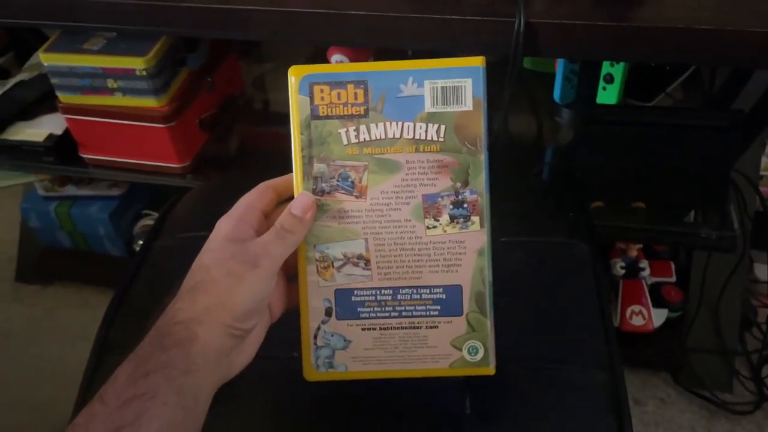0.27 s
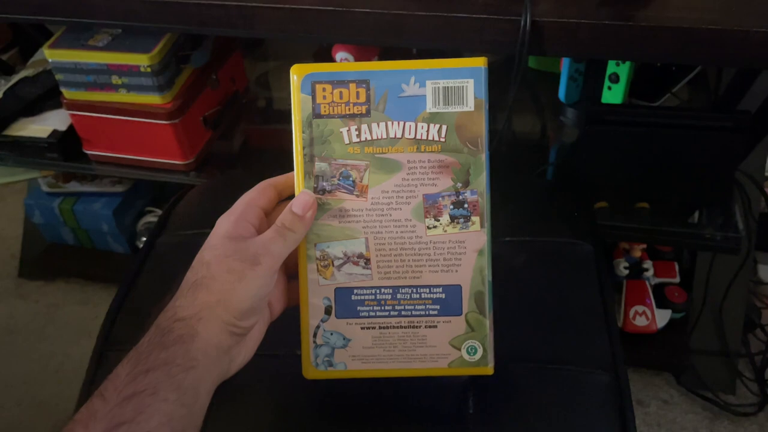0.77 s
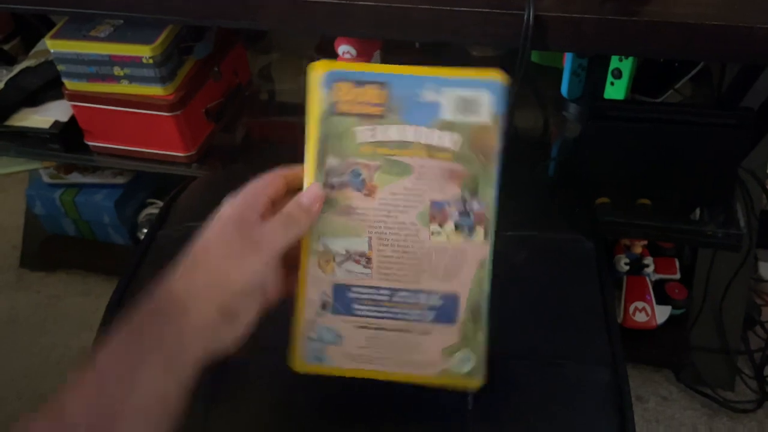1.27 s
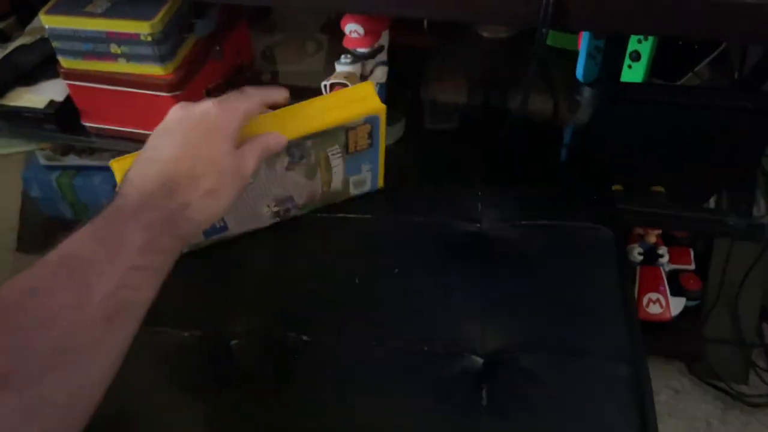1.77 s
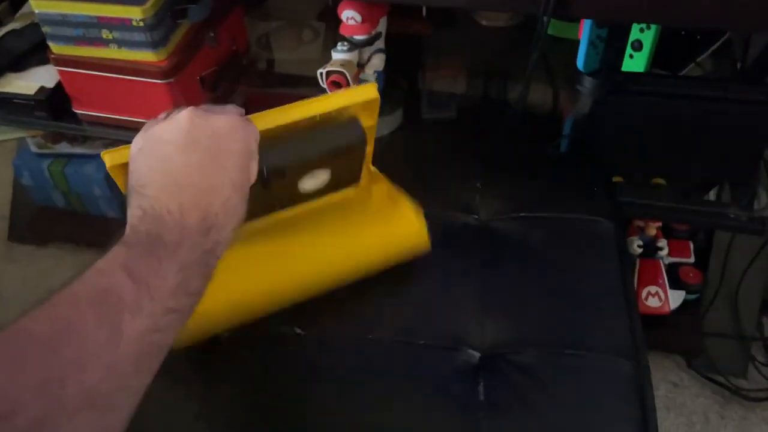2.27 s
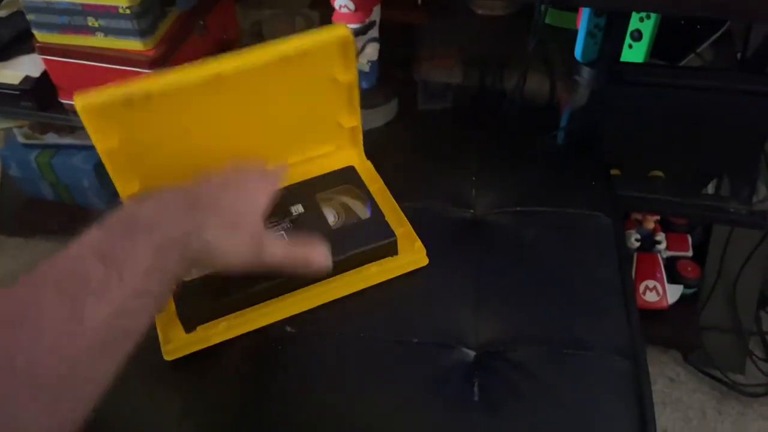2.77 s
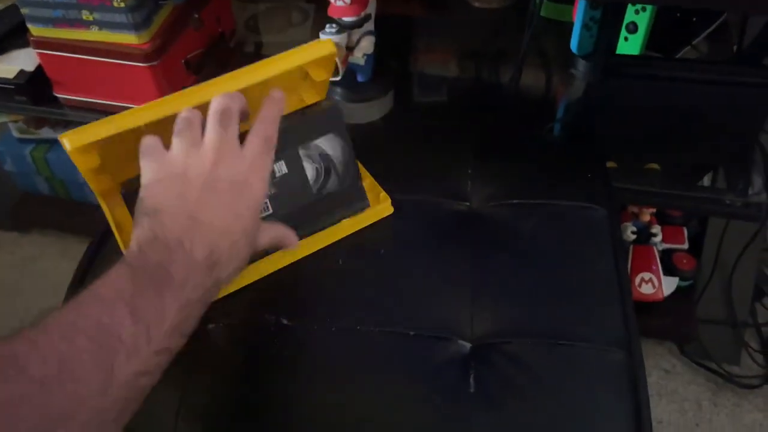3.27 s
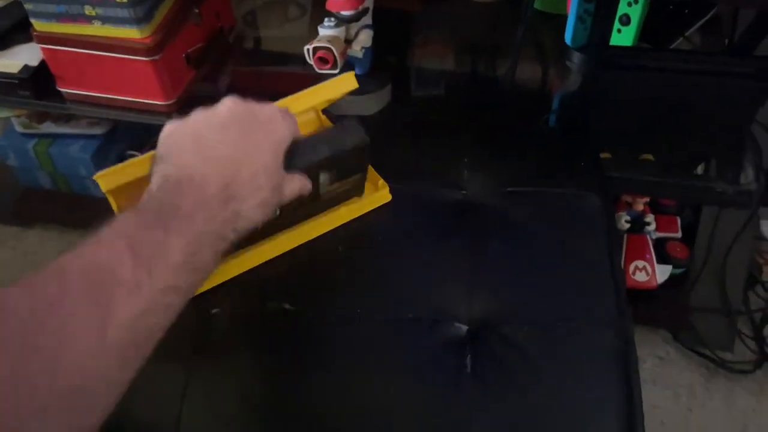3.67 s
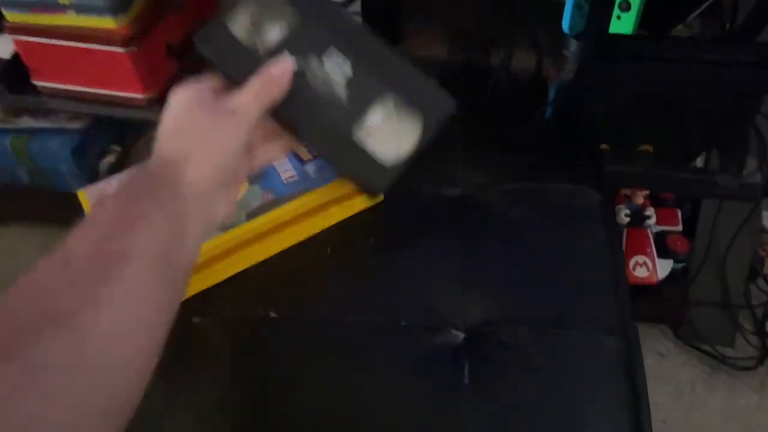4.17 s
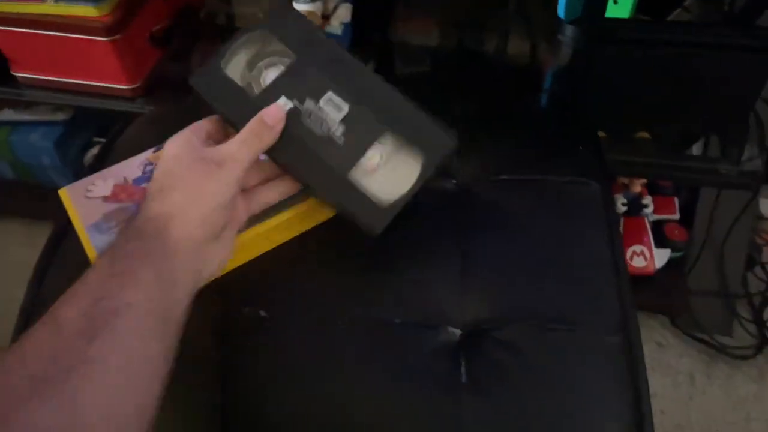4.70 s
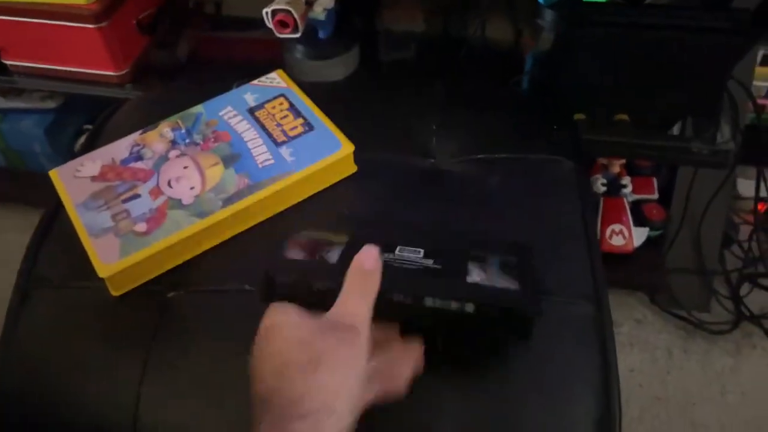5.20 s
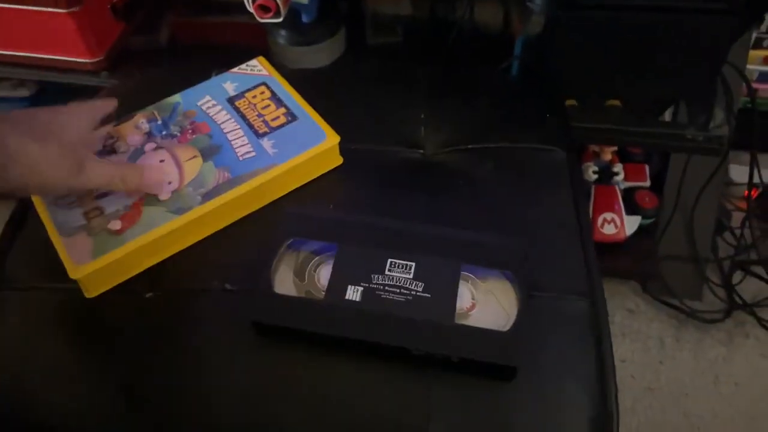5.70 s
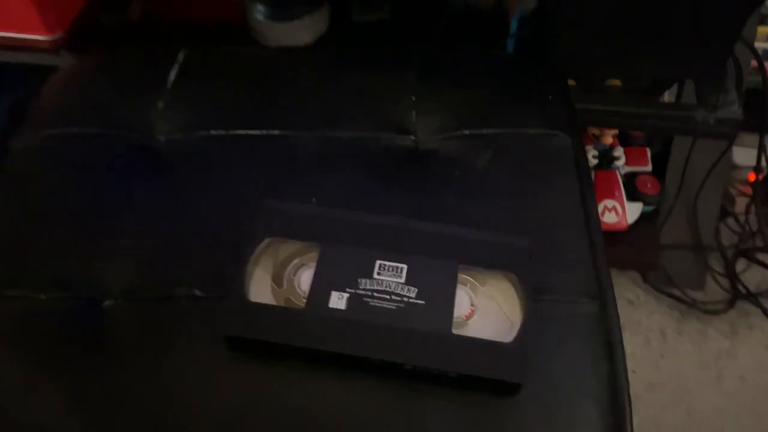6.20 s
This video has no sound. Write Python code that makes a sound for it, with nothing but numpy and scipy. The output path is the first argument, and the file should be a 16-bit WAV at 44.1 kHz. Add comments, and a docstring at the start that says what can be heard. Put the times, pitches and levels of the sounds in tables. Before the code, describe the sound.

In a small, quiet room with a low hum, hands handle a hollow plastic video case close to the microphone. It taps down on a padded seat and pops open with a cluster of sharp snaps. More clicks and scrapes follow as the cassette is worked loose. The cassette bumps the case with a hollow clack, slides onto the cushion and thuds softly, and the case is lifted away with faint rubbing.

```python
"""A plastic clamshell video case is turned over, set on a padded stool and snapped open in a small room.
The cassette is prised out, knocks against the closed case and slides onto the cushion; the case is lifted.
Each contact is a stick-slip crackle that rings the plastic, plus a hollow knock of the case walls.
Hands and plastic rub in between, tight edges squeak, the seat thuds. A close phone picks it up over
the low hum of a quiet house."""
import sys
import numpy as np
from scipy import signal
from scipy.fft import rfft, irfft
from scipy.io import wavfile
from scipy.ndimage import uniform_filter1d

SR = 44100
rng = np.random.default_rng(int(sys.argv[2]) if len(sys.argv) > 2 else 0)


def unload_wav(signal):
    """Save mono or channel-first audio to the path in sys.argv[1] as 16-bit WAV at rate SR, clipped to [-1, 1]."""
    wavfile.write(
        sys.argv[1],
        SR,
        np.round(np.clip(np.atleast_2d(signal).T, -1, 1) * 32767).astype(np.int16),
    )


N = 284445
T = np.arange(N) / SR
HIT_T = T[:SR // 4]

# plastic contacts: (time [s], contact time [s], wall pitch [Hz], knock [dB], snap [dB],
# treble re snap [dB])
CONTACTS = [(1.373, 0.0018, 376, -31.5, -53.5, -3.5), (1.463, 0.0028, 410, -40.5, -54, -0.5),
            (1.633, 0.0012, 379, -51, -70.5, -7.5), (1.724, 0.0038, 344, -44, -55, 0),
            (1.731, .0015, 333, -37, -43, -7), (1.738, 0.0021, 307, -33.5, -47, 2),
            (1.762, 0.0056, 370, -27.5, -42, -3.5), (1.839, 0.0046, 358, -41, -74, -6),
            (1.891, 0.0022, 370, -44, -58.5, -2), (1.963, 0.00087, 410, -39.5, -52.5, 7),
            (1.970, 0.004, 423, -35.5, -45, -1.5), (2.007, 0.0022, 385, -39.5, -51.5, 0),
            (2.158, 0.029, 380, -48, -76.5, -5), (2.263, 0.0063, 300, -14, -31, -2),
            (2.272, 0.013, 250, -23.5, -35, -2.5), (2.334, 0.0057, 390, -21.5, -32.5, -2.5),
            (2.356, 0.013, 288, -32, -39.5, -1), (2.409, 0.0093, 296, -37, -40, -5),
            (2.434, .0055, 433, -27, -19, 0), (2.439, .0081, 420, -27, -23.5, 0),
            (2.448, 0.0023, 431, -34.5, -25.5, 0.5), (2.491, 0.01, 338, -29.5, -33.5, 0),
            (2.524, 0.0038, 344, -50, -47, -3), (2.587, 0.0042, 424, -44, -46.5, -8),
            (2.616, .0067, 470, -32.5, -26, -0.5), (2.855, 0.0015, 297, -49.5, -55.5, -6),
            (2.916, .006, 453, -40.5, -52.5, -1.5), (2.932, 0.0039, 371, -27, -32, -4.5),
            (2.955, 0.021, 334, -29.5, -51, -4), (2.978, 0.0044, 394, -39.5, -49.5, 3.5),
            (3.069, 0.0023, 340, -55.5, -72, -24), (3.264, 0.0025, 372, -48.5, -47.5, -1),
            (3.296, .002, 435, -45, -51, -12), (3.395, 0.014, 280, -39.5, -33, -0.5),
            (3.402, .0044, 243, -34, -35, 2.5), (3.507, 0.0046, 344, -29, -37, 0),
            (3.541, 0.0047, 463, -43.5, -33.5, 3.5), (3.554, 0.0048, 350, -28, -30.5, 2.5),
            (3.564, 0.0048, 307, -27.5, -31.5, -0.5), (3.677, 0.0036, 400, -43, -54.5, -2.5),
            (3.751, .007, 374, -39, -42, 0.5), (3.839, 0.0048, 385, -33, -35.5, 5.5),
            (4.296, 0.0023, 399.7, -27, -41, -14.5), (4.307, 0.0034, 418, -28.5, -44, -8.5),
            (4.362, 0.0066, 387, -15, -26, -9.5), (4.405, .002, 373, -29, -35.5, 4),
            (4.407, .006, 352, -25, -37.5, -20.5), (4.635, 0.0025, 390, -52.5, -58.5, -8.5),
            (5.153, 0.0038, 298.7, -42.5, -54.5, -7), (5.168, 0.0092, 300, -40.5, -38.5, -2),
            (5.182, 0.0051, 356, -36.5, -28, 0.5), (5.246, .006, 284, -38, -38, -3.5),
            (5.273, 0.0039, 380, -45, -44, 2), (5.363, 0.0045, 345, -24, -32, 1.5),
            (5.451, 0.0095, 295, -35, -44, 2.5), (5.773, .0011, 319, -64, -69, 10.5),
            (5.839, 0.0083, 228, -45.5, -59.5, -1), (6.35, 0.011, 409, -57.5, -58, 0.5),
            (6.403, 0.017, 419, -56, -52.5, 8)]
# skin and plastic sliding: (start [s], fastest [s], end [s], wall rumble [dB], hiss [dB])
STROKES = [(1.16, 1.466, 1.69, -62, -89), (1.702, 1.771, 1.823, -35.5, -50.5),
           (1.837, 1.91, 2.45, -62, -72.5), (2.242, 2.42, 2.82, -37, -51), (3.0, 3.13, 3.284, -52, -54.5),
           (3.217, 3.288, 3.39, -43.5, -61), (3.357, 3.404, 3.49, -40.5, -48),
           (3.485, 3.544, 3.57, -29.5, -41.5), (3.62, 3.725, 4.016, -47.5, -59.5),
           (4.263, 4.286, 4.33, -66.5, -57), (4.413, 4.54, 4.78, -58.5, -66.5),
           (4.666, 4.755, 4.83, -57.5, -66), (4.863, 4.891, 5.0, -66, -70.5),
           (5.04, 5.092, 5.1, -68, -77.5), (5.143, 5.182, 5.53, -42, -46), (5.642, 5.772, 5.8, -54.5, -82),
           (5.787, 5.97, 6.1, -52.5, -54.5), (6.005, 6.324, 6.3, -60, -69), (6.29, 6.408, 6.82, -58.5, -54)]


def undb(db):
    """Decibels to gain."""
    return 10 ** (np.asarray(db) / 20)


def level(x, db):
    """Scale a steady sound to an rms level."""
    return x * undb(db) / np.sqrt(np.mean(x ** 2))


def blow(x, db, window_s=.02):
    """Scale a short sound to the energy of window_s at db."""
    return x * undb(db) / np.sqrt(np.sum(x ** 2, axis=-1, keepdims=True) / (window_s * SR))


def add(track, time_s, x):
    """Mix x into the track from time_s on."""
    i = int(time_s * SR)
    track[..., i:i + x.shape[-1]] += x[..., :N - i]


def ring(x, response):
    """Pass x through an impulse response."""
    return signal.fftconvolve(np.atleast_2d(x), np.atleast_2d(response), axes=-1)[:, :x.shape[-1]]


def band(x, lo_hz, hi_hz, order=3):
    """Butterworth band-pass."""
    return signal.sosfilt(signal.butter(order, [lo_hz, hi_hz], "band", fs=SR, output="sos"), x)


def colour(x, points, size=4096):
    """Minimum-phase filter through points (frequency [Hz], gain [dB])."""
    hz, db = np.transpose(points)
    grid_hz = np.maximum(np.arange(size // 2 + 1) * SR / size, 1)
    gain = undb(np.interp(np.log(grid_hz), np.log(hz), db))
    cepstrum = irfft(np.log(gain))
    cepstrum[1:size // 2] *= 2
    cepstrum[size // 2 + 1:] = 0
    return ring(x, irfft(np.exp(rfft(cepstrum))))


def fade(t, t60_s):
    """Exponential decay, 60 dB in t60_s."""
    return np.exp(-np.log(1000) * t / t60_s)


def walk(rate_hz, size):
    """Ramps between random values; spread near 1."""
    step = max(int(SR / rate_hz), 1)
    return uniform_filter1d(np.repeat(rng.standard_normal(size // step + 1), step), step)[:size]


def resonance(t, hz, t60_s):
    """Impulse response of one mode, peak gain 1."""
    decay = fade(t, t60_s)
    return 2 * decay / decay.sum() * np.cos(2 * np.pi * hz * t)


def house_hum(hum_db=-64, waver_db=1, flutter_db=2.0, flutter_band_hz=(480, 950)):
    """The low hum of a quiet house wavers; its faint mid-range flutters."""
    # noise spectrum: (frequency [Hz], relative density [dB])
    spectrum = [(20, -25), (38, -6), (57, 3.5), (81, -12.5), (107, -8), (138, -22.5), (180, -21),
                (410, -30.5), (620, -22), (820, -28), (1100, -38.5), (2020, -42.5), (16000, -52)]
    hum = level(colour(rng.standard_normal((2, N)), spectrum), hum_db)
    middle = signal.sosfiltfilt(signal.butter(2, flutter_band_hz, "band", fs=SR, output="sos"), hum)
    return (hum - middle) * undb(waver_db * walk(6.6, N)) + middle * undb(flutter_db * walk(24, N))


def room(x, low_db=-16, high_db=-13.5, low_t60_s=0.34, high_t60_s=0.25, build_s=0.0075):
    """Furniture and near walls return a short dense tail; a few low modes linger."""
    # room modes: (frequency [Hz], gain [dB], t60 [s])
    modes = [(171, -7, 0.09), (453, -2.5, 0.12), (500, -7, 0.18)]
    t = T[:SR // 2]
    echoes = rng.standard_normal((2, len(t))) * (1 - np.exp(-(t / build_s) ** 2))
    low, high = (echoes * fade(t, t60_s) for t60_s in (low_t60_s, high_t60_s))
    low, high = (tail / np.sqrt(np.sum(tail[0] ** 2)) for tail in (low, high))
    linger = sum(undb(db) * resonance(t, hz, t60_s) for hz, db, t60_s in modes)
    return ring(x, undb(low_db) * band(low, 70, 840) + undb(high_db) * band(high, 750, 11000) + linger)


def mic_ports(x):
    """Two views of the sound become mid and side, then left and right at the microphone ports."""
    # likeness of the ports: (frequency [Hz], correlation [-1..1])
    likeness = [(150, 0.98), (400, 0.95), (900, 0.65), (3600, .15), (5300, 0.4), (7000, 0.61), (8700, .7),
                (9500, 0.2), (10200, -.95), (11400, 0.66), (12200, .8)]
    # port imbalance: (frequency [Hz], left minus right [dB])
    imbalance = [(100, 0.35), (380, -2.5), (700, 1.55), (1300, 0.3), (2400, 1), (4400, 0)]
    hz, correlation = np.transpose(likeness)
    mid = colour(x[0], np.c_[hz, 10 * np.log10((1 + correlation) / 2)])
    side = colour(x[1], np.c_[hz, 10 * np.log10((1 - correlation) / 2)])
    hz, lean_db = np.transpose(imbalance)
    return np.vstack([colour(mid + sign * side, np.c_[hz, sign * lean_db / 2]) for sign in (1, -1)])


def shell(force, scatter_db=1.5):
    """Contact forces radiate directly and ring the plastic; each striking point favours other modes."""
    # stiff plastic modes: (frequency [Hz], gain re direct sound [dB], t60 [s])
    modes = [(835, 0, 0.069), (1114, -1, 0.3), (1345, 1.5, .25), (1472, 2, 0.1), (1635, 3.5, .1),
             (1970, 1, 0.11), (2348, 1.5, 0.33), (3430, -4, 0.087), (4480, 0, 0.046), (5473, -9, 0.06),
             (5330, 2.5, .04), (5900, -1.5, 0.04), (8430, -2, 0.04), (10860, -1, 0.0049)]
    gains = undb(np.array(modes)[:, 1] + scatter_db * rng.standard_normal(len(modes)))
    ringing = sum(gain * resonance(HIT_T, hz, t60_s) for gain, (hz, _, t60_s) in zip(gains, modes))
    return ring(force, signal.unit_impulse(len(HIT_T)) + ringing)


def wall_knock(pitch_hz, contact_s, flex_s=.0034, lag=0.028, detune=0.14):
    """The broad walls take a few milliseconds to give way, then swing for a few cycles."""
    # wall flexing modes: (frequency [x wall pitch], level [dB], t60 [s])
    modes = [(.66, -9, 0.022), (0.998, 3, 0.022), (1.25, -13.5, .032)]
    swing = 0
    for ratio, db, t60_s in modes:
        hz = pitch_hz * ratio * (1 + detune * rng.standard_normal())
        swing += undb(db) * fade(HIT_T, t60_s) * np.sin(2 * np.pi * hz * (HIT_T - flex_s))
    give = 1 - np.exp(-(HIT_T / (flex_s + lag * contact_s)) ** 4)
    return band(swing * give, 140, 1500, order=2)  # the knock carries little deep bass


def fingertips(median_gap_s=1 / 16, pitch_hz=306, contact_s=.011, over_db=0.5, scatter_db=3, max_db=-46):
    """Sliding fingertips bump the walls at random, about as loud as the stroke's rumble."""
    out = np.zeros((2, N))
    gaps, sizes = rng.standard_normal((128, 2)).T
    for time_s, size in zip(np.cumsum(np.exp(gaps / 2)) * median_gap_s, sizes):
        rumble = sum(undb(db) * np.interp(time_s, times_s, [0, 1, 0]) for *times_s, db, _ in STROKES)
        if rumble > 0 and time_s < T[-1]:
            db = min(20 * np.log10(rumble) + over_db + scatter_db * size, max_db)
            add(out[0], time_s, blow(wall_knock(pitch_hz, contact_s), db))
    return out


def slides(lead_s=.014, tail_s=.13):
    """Strokes and contact drags: (start [s], fastest [s], end [s], rumble [dB], scrape [dB], hiss [dB])."""
    strokes = [(*times_s, rumble_db, (rumble_db + hiss_db) / 2 - 2, hiss_db)
               for *times_s, rumble_db, hiss_db in STROKES]
    drags = [(time_s - lead_s, time_s, time_s + tail_s,
              knock_db - 20.5, snap_db - 14.5, snap_db + treble_db - 24.5)
             for time_s, _, _, knock_db, snap_db, treble_db in CONTACTS]
    return strokes + drags


def rubbing(grain_db=3.5, grip_db=3.0, swell_power=1.96):
    """Dense tiny slips, bunched by an uneven grip, shake the walls and hiss on the surface."""
    friction = undb(grain_db * walk(2500, N) + grip_db * walk(70, N))
    rumble = band(friction * rng.standard_normal((2, N)), 57, 520, order=2)
    scrape = band(shell(friction * rng.standard_normal((2, N))), 1500, 4800, order=2)
    hiss = band(shell(friction * rng.standard_normal((2, N))), 6500, 11000, order=2)
    power = np.zeros((3, N))
    for start_s, fastest_s, end_s, *levels_db in slides():
        span = slice(int(start_s * SR), int(end_s * SR))
        ramp = np.interp(T[span], [start_s, fastest_s, end_s], [0, 1, 0])
        speed = np.sin(np.pi / 2 * ramp) ** swell_power
        power[:, span] += np.outer(undb(levels_db), speed) ** 2
    return sum(np.sqrt(p) * level(part, 0) for p, part in zip(power, (rumble, scrape, hiss)))


def cushion(give_s=0.0021, sink_s=.016, pad_t60_s=0.083, boom_t60_s=0.21, pad_db=-1, boom_db=-7):
    """The weight sinks into the padding, so each thud falls in pitch; the stool under it booms."""
    # landings on the seat: (time [s], nominal pitch [Hz], level [dB])
    thuds = [(1.736, 128, -35.5), (2.266, 149, -39.5), (2.338, 96, -32.5), (2.375, 106, -35.5),
             (2.439, 143, -35), (2.5, 130, -38.5), (2.954, 112.4, -35), (3.405, 142, -33.5),
             (3.563, 131, -38), (4.308, 170, -34.5), (4.412, 156, -29.5), (5.365, 105, -26),
             (5.376, 65, -24), (5.456, 94, -40), (5.85, 115.8, -47)]
    out = np.zeros((2, N))
    glide = 0.34 + 1.16 * np.exp(-HIT_T / sink_s)
    give = 1 - np.exp(-HIT_T / give_s)
    for time_s, hz, db in thuds:
        pad = give * np.sin(2 * np.pi * np.cumsum(hz * glide) / SR) * fade(HIT_T, pad_t60_s)
        boom = band(give * rng.standard_normal(len(HIT_T)) * fade(HIT_T, boom_t60_s), 36, 82, order=2)
        add(out[0], time_s, blow(pad, db + pad_db) + blow(boom, db + boom_db))
    return out


def squeaks(waver=0.016):
    """A tight edge sticks and slips at one resonance for a few milliseconds."""
    # catch and cassette squeezing past edges: (time [s], length [s], pitch [Hz], level [dB])
    squeezes = [(2.424, 0.0061, 5700, -38), (2.614, 0.0084, 11270, -28.5), (3.5397, 0.0037, 5320, -30),
                (3.565, 0.0025, 5230, -37)]
    out = np.zeros((2, N))
    for time_s, length_s, hz, db in squeezes:
        swell = HIT_T * np.exp(-(HIT_T / length_s) ** 2)
        for view in out:
            pitch_hz = hz * (1 + waver * walk(1500, len(HIT_T)))
            add(view, time_s, blow(swell * np.sin(2 * np.pi * np.cumsum(pitch_hz) / SR), db))
    return out


def crackle(contact_s, rise=0.93, grain_db=3.0, chatter_db=-23, chatter_t60_s=0.12):
    """Edges catch and slip many times in one contact, then loose parts chatter briefly."""
    press = (1 - np.exp(-HIT_T / (rise * contact_s))) * np.exp(-(HIT_T / contact_s) ** 2)
    chatter = undb(chatter_db) * fade(HIT_T, chatter_t60_s)
    force = (press + chatter) * undb(grain_db * walk(3000, len(HIT_T)))
    return shell(force * rng.standard_normal((2, len(HIT_T))))


def case_contacts(hardness_per_db=0.029, knock_share=0.49):
    """Clack, snap, sizzle and wall knock of each contact; harder edges put more energy in the treble."""
    out = np.zeros((2, N))
    for time_s, contact_s, pitch_hz, knock_db, snap_db, treble_db in CONTACTS:
        crack = crackle(contact_s)
        # blunt edge: lower clack and snap bands, louder clack
        hardness = np.clip(1 + hardness_per_db * treble_db, .55, 1)
        clack_db = snap_db + knock_share * (knock_db - snap_db) - 0.63 * treble_db - 6
        clack = band(crack, 720 * np.sqrt(hardness), 2050 * np.sqrt(hardness), order=2)
        snap = -band(crack, 2300, 6100 * hardness, order=2)  # inverted: bands join without a notch
        sizzle = band(crack, 6800, 14200)
        knock = np.array([wall_knock(pitch_hz, contact_s) for _ in range(2)])
        add(out, time_s, blow(clack, clack_db) + blow(snap, snap_db) + blow(sizzle, snap_db + treble_db))
        add(out, time_s, blow(knock, knock_db - 0.5))
    return out


def scene():
    """Handling noises, their room tail and the house hum at the microphone ports."""
    near = case_contacts() + cushion() + squeaks() + rubbing() + fingertips()
    return mic_ports(near + room(near) + house_hum())


def record(dry):
    """The phone's ports ring in the high treble; peaks are rounded and the top is cut."""
    # microphone response: (frequency [Hz], gain [dB])
    response = [(20, -19), (60, 1.5), (5600, 0), (6900, -3.5), (9000, -1), (11500, 3.5), (12500, -7),
                (13400, -28), (16000, -32)]
    ceiling, top_hz = .95, 16300
    x = colour(dry, response)
    x = x / (1 + (x / ceiling) ** 6) ** (1 / 6)
    return signal.sosfilt(signal.ellip(8, .2, 70, top_hz, fs=SR, output="sos"), x)


dry = scene()
out = record(dry)
unload_wav(out)
```